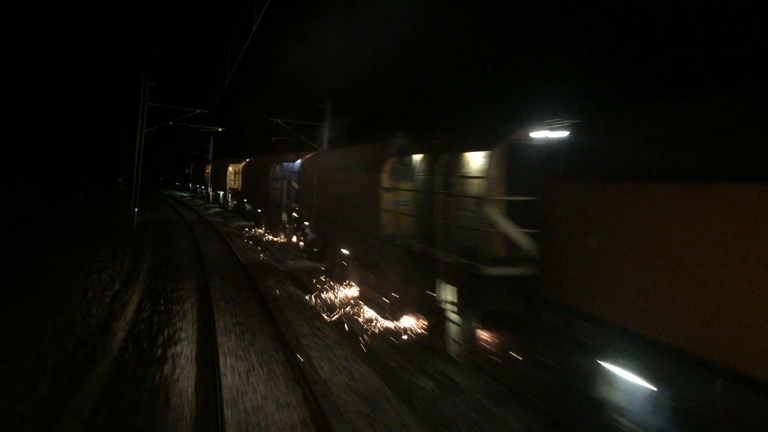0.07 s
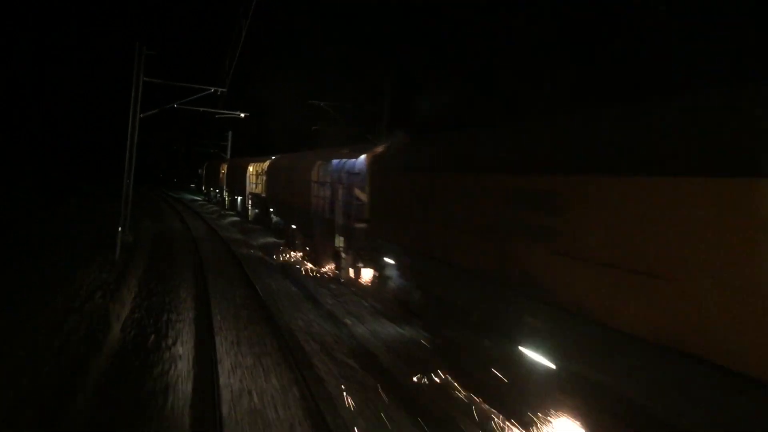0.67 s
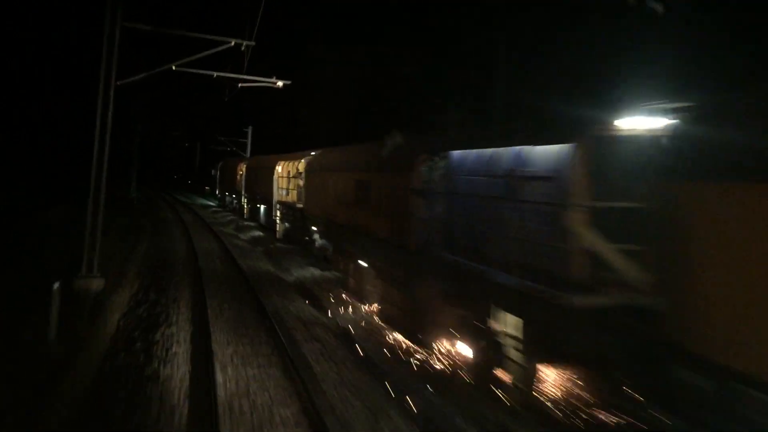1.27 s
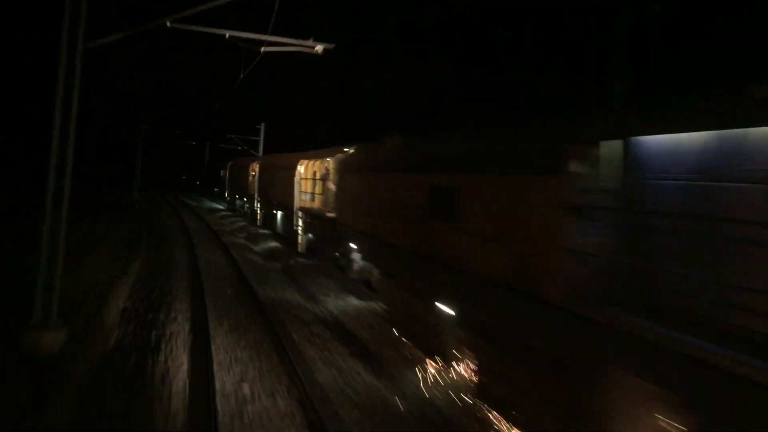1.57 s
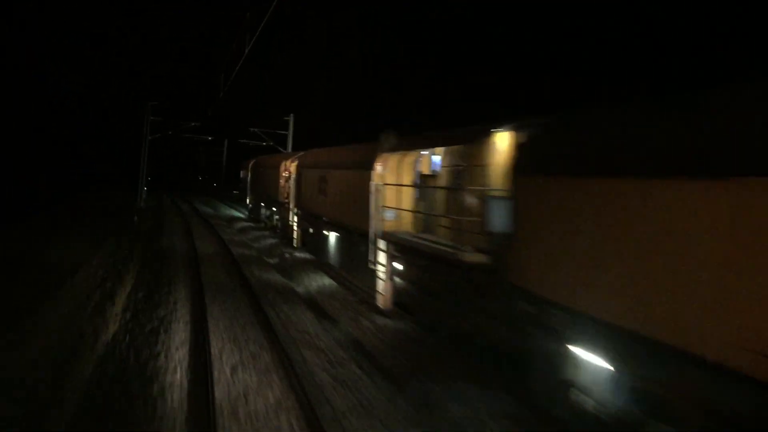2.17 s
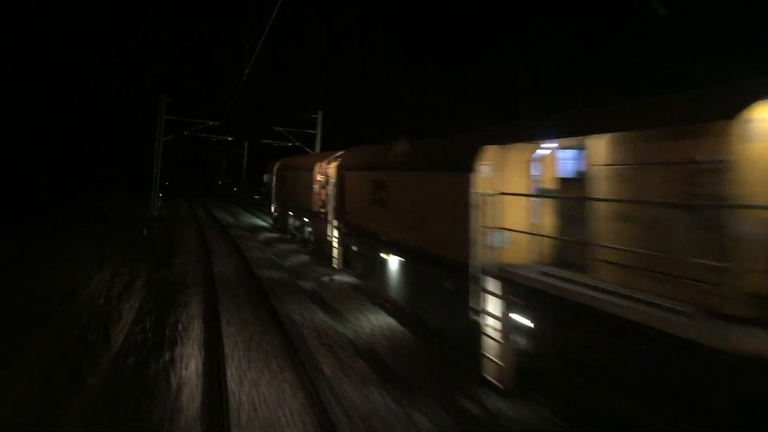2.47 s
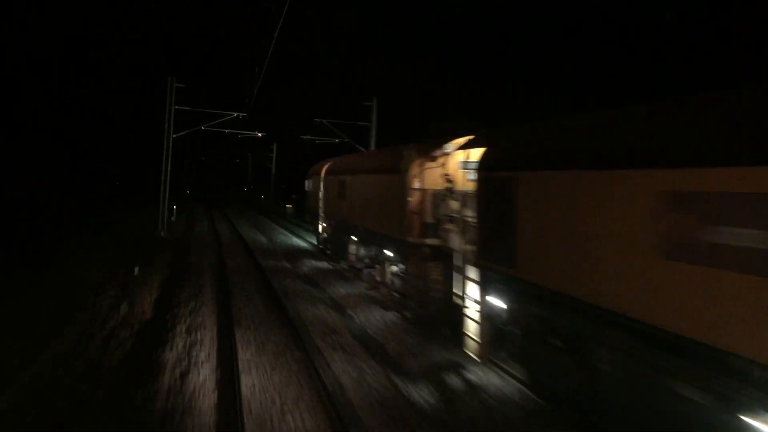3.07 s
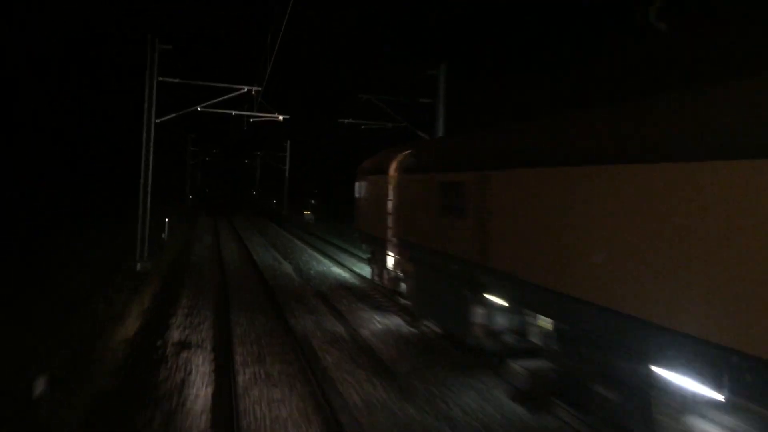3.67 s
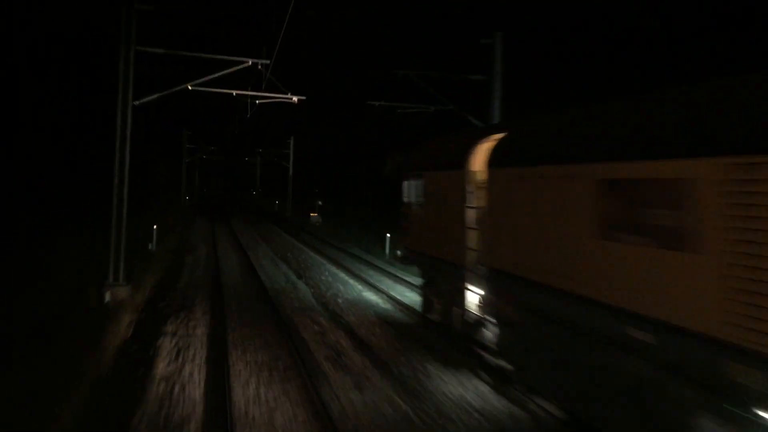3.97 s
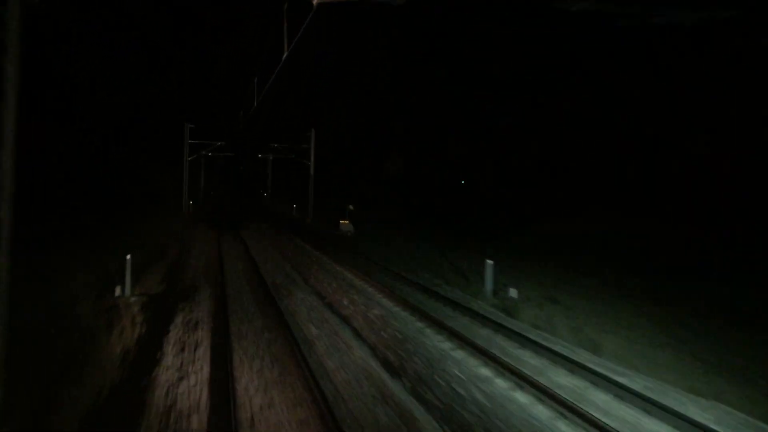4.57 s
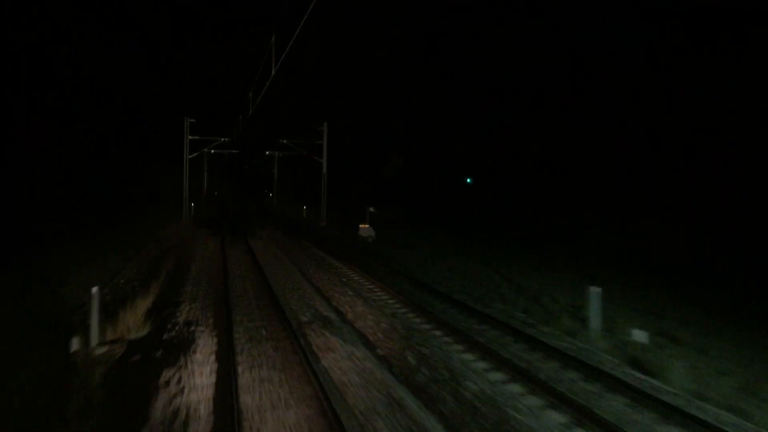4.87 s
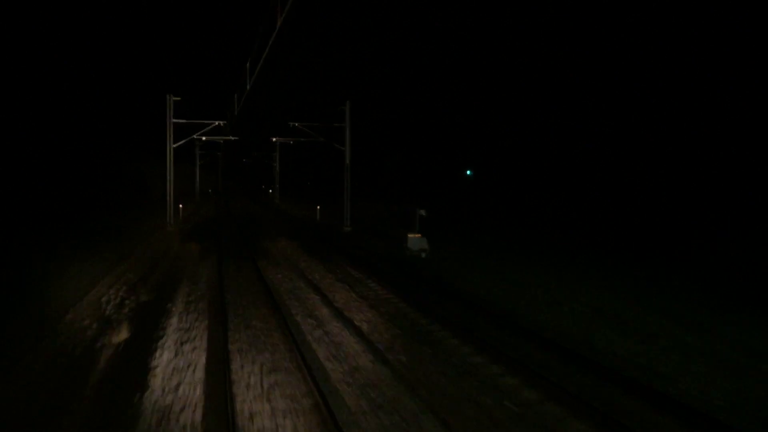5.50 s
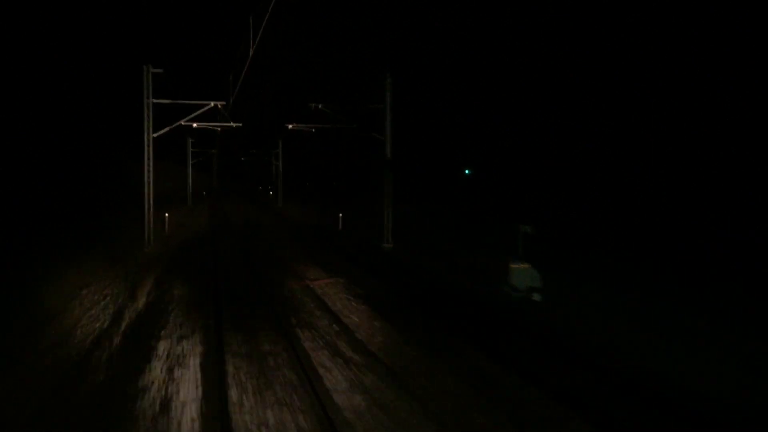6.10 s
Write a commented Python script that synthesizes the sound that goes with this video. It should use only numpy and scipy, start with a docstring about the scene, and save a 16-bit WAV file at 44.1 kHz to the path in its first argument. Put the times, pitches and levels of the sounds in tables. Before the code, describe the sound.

A moving train rumbles with squealing wheels as a rail grinding train roars past on the next track.

```python
"""A rail grinder passing a moving train.

Heard from the cab, the body rumbles, the drive whines and, in a curve, flange friction makes the
wheels ring and squeal. On the next track a grinding train goes by: its stones roar on the rail and
throw sparks, and its engines drone past in turn, each falling in pitch by the Doppler effect."""
import sys
import numpy as np
from scipy import signal
from scipy.fft import rfft, irfft
from scipy.io import wavfile
from scipy.ndimage import uniform_filter1d

SR = 44100
rng = np.random.default_rng(int(sys.argv[2]) if len(sys.argv) > 2 else 0)


def wrap_up_sound(samples):
    """Save the sound to the file named by the first command line argument, as 16-bit audio."""
    columns = np.atleast_2d(samples).T
    # keep every value between -1 and 1, then stretch to whole-number steps
    tamed = np.clip(columns, -1, 1)
    steps = np.round(tamed * 32767).astype(np.int16)
    wavfile.write(sys.argv[1], SR, steps)


N = 279594
TIME = np.arange(N) / SR


def gain_of(db):
    """Amplitude ratio of a level in decibels."""
    return 10 ** (np.asarray(db) / 20)


def unit_rms(x):
    """Normalisation to an rms of one."""
    return x / np.sqrt(np.mean(x ** 2) + 1e-20)


def curve(rows):
    """Linear interpolation of (time [s], value) rows at every sample."""
    return np.interp(TIME, *np.transpose(rows))


def swells(rows, edge_s):
    """Superposed smooth pulses, from rows of (centre [s], duration [s], height)."""
    total = np.zeros(N)
    for s, length, height in rows:
        rise = np.tanh((TIME - s + length / 2) / edge_s)
        fall = np.tanh((TIME - s - length / 2) / edge_s)
        total += height / 2 * (rise - fall)
    return total


def drift(rate_hz):
    """Random fluctuation: low-pass noise of unit rms."""
    hz = np.fft.rfftfreq(N, 1 / SR)
    return unit_rms(irfft(rfft(rng.standard_normal(N)) / (1 + (hz / rate_hz) ** 2), N))


def tone(hz):
    """A sinusoid of unit rms whose phase is the integral of its frequency."""
    return np.sqrt(2) * np.sin(2 * np.pi * (np.cumsum(hz * np.ones(N)) / SR + rng.random()))


def noise(spectrum, patchy_db, size=1024):
    """Spectrally shaped noise of unit rms, its level varying in small patches of time and frequency."""
    frames = signal.stft(rng.standard_normal(N), nperseg=size)[2]
    patches = uniform_filter1d(rng.standard_normal(frames.shape), size=12, axis=0)
    patches = unit_rms(uniform_filter1d(patches, size=6, axis=1))
    white = signal.istft(frames * gain_of(patchy_db * patches), nperseg=size)[1][:N]
    hz = np.fft.rfftfreq(N, 1 / SR) + 1
    points_hz, db = np.transpose(spectrum)
    colour = gain_of(np.interp(np.log(hz), np.log(points_hz), db))
    roll_off = np.minimum(1, points_hz[-1] / hz) ** 2  # above the last point
    return unit_rms(irfft(rfft(white) * colour * roll_off, N))


def ringing(modes):
    """Resonance under friction: each mode wanders in amplitude and phase within its bandwidth."""
    return sum(gain_of(db) * unit_rms(drift(width / 2) * tone(hz) + drift(width / 2) * tone(hz))
               for hz, width, db in modes)


def nearness(abreast_s, half_width_s):
    """Inverse-distance law for a source passing in a straight line, equal to one when abreast."""
    return 1 / np.hypot(1, (TIME - abreast_s) / half_width_s)


# Machinery hum: (frequency [Hz], level relative to the rumble [dB])
HUM_TONES = [(49.8, -12.5), (58.7, -1), (72.6, -0.5), (99.9, -7.5), (116.4, -7.5), (174.5, -21.5),
             (232.7, -26), (264, -25)]
# Low rolling noise: (frequency [Hz], relative spectral density [dB])
RUMBLE_SPECTRUM = [(15, -29.5), (28, -25), (40, -12), (55, -3.5), (80, -0.5), (105, -2), (135, -9),
                   (168, -5.5), (205, -15), (222, -15.5), (255, -16), (292, -23), (345, -19.5), (450, -30),
                   (700, -49.5)]
# Envelope of rumble and hum: (time [s], level [dB])
RUMBLE_LEVELS = [(0, -26), (1, -28), (1.4, -25), (2.1, -29), (2.7, -25.5), (3.7, -27), (4.2, -24.5),
                 (4.7, -25.5), (6.34, -24.5)]
# High rolling noise: (frequency [Hz], relative spectral density [dB])
ROLLING_SPECTRUM = [(250, -36), (480, 1.5), (560, -3.5), (620, 3), (700, 0), (950, -2.5), (1250, 2),
                    (1480, -4), (1800, -3), (2650, -7), (3200, -6), (4200, -10.5), (6500, -19),
                    (14000, -41.5)]


def cab(shake_db=0.5, hum_waver=0.24, rolling_db=-42.5):
    """Forced vibration: the body hums with its machinery and rumbles and hisses over the track."""
    hum = sum(gain_of(db) * (1 + hum_waver * drift(8.4)) * tone(hz) for hz, db in HUM_TONES)
    rumble = gain_of(shake_db * drift(9.3)) * noise(RUMBLE_SPECTRUM, patchy_db=-0.6)
    hiss = gain_of(rolling_db) * noise(ROLLING_SPECTRUM, patchy_db=1.54)
    return gain_of(curve(RUMBLE_LEVELS)) * (hum + rumble) + hiss


# Traction converter tones: (frequency [Hz], level [dB])
CONVERTER_TONES = [(1498, -77.5), (1598, -59.5), (1697, -58), (1797, -55), (3595, -59)]


def converter(flutter=0.23, wander_hz=0.66):
    """A line spectrum: the traction converter's tones waver in level about near-constant pitches."""
    return sum(gain_of(db) * (1 + flutter * drift(1.8)) * tone(hz + wander_hz * drift(5.0))
               for hz, db in CONVERTER_TONES)


# Pitch of the gear whine: (time [s], frequency [Hz])
MESH_PITCH = [(0, 1226), (1.5, 1228), (3.5, 1231), (4.7, 1235), (6.34, 1237)]
# Surges of the whine: (centre [s], duration [s], rise [dB])
GEAR_SURGES = [(.25, 0.21, 8), (.64, .2, 11.5), (1.62, 0.28, 5), (2.56, .16, 5.5), (2.8, 0.074, 9),
               (3.46, 0.11, 6.5), (3.75, 0.1, 9.5), (4.16, 0.17, 6.5), (4.37, 0.1, 11), (4.67, .12, 8),
               (4.87, .12, 8.5), (5.3, .5, 6.5), (5.9, 0.42, 4), (6.28, .1, 5)]


def gears(start_db=-54.5, rise_db_per_s=0.5, wander_hz=1.7, flutter=0.047):
    """Tooth meshing: the gears whine, rising in pitch and level as the train gathers speed."""
    level_db = start_db + rise_db_per_s * TIME + swells(GEAR_SURGES, edge_s=0.034)
    whine = tone(curve(MESH_PITCH) + wander_hz * drift(24.2))
    return gain_of(level_db) * whine * (1 + flutter * drift(25))


# Steady flange rub, letting go as the curve ends: (time [s], level [dB])
RUB_LEVELS = [(0, -51), (1, -48), (2.1, -46.5), (3, -47), (4.4, -46), (5.1, -50.8), (5.97, -50.8),
              (6.1, -67), (6.34, -69)]
# Harder bites of the flanges: (centre [s], duration [s], rise [dB])
FLANGE_BITES = [(.21, 0.42, 5.5), (.54, 0.26, 4), (1.38, 0.6, 3), (1.76, 0.092, 2.5), (2.54, 0.62, 3.5),
                (3.48, 0.51, 3), (4.17, .16, 0.5), (4.61, 0.12, 6), (4.86, 0.19, 5)]


def rub_db():
    """Sliding friction of flange on rail: the level that drives the ring and the squeal."""
    return curve(RUB_LEVELS) + swells(FLANGE_BITES, edge_s=0.035)


# Broad ring of the wheels: (frequency [Hz], relative spectral density [dB])
RING_SPECTRUM = [(4300, -14.5), (4900, -13), (5150, 1.5), (5400, 6.5), (5700, 1.5), (5950, -7),
                 (6300, -17.5), (7800, -43), (10000, -42)]
# Single wheel modes: (frequency [Hz], bandwidth [Hz], level relative to the broad ring [dB])
RING_MODES = [(5030, 48, -16), (5200, 58, -16), (5510, 28, -17)]
# Shrill ring an octave higher: (frequency [Hz], relative spectral density [dB])
SHRILL_SPECTRUM = [(8500, -16), (10250, -3), (10800, -0.5), (11250, 2.5), (11700, -5), (12300, -35),
                   (14000, -46)]
# Envelope of the shrill ring: (time [s], level relative to the rub [dB])
SHRILL_LEVELS = [(0, -18.5), (.6, -15.5), (1, -19), (2.5, -20.5), (3.8, -21), (4.6, -20), (5.6, -19.5),
                 (6.34, -26)]


def wheel_ring(ring_over_rub_db=4.5, chatter_db=0.54):
    """Frictional excitation: flanges chatter on the rail and set the wheels ringing in two bands."""
    ring = gain_of(ring_over_rub_db) * (noise(RING_SPECTRUM, patchy_db=1.0) + ringing(RING_MODES))
    shrill = gain_of(curve(SHRILL_LEVELS)) * noise(SHRILL_SPECTRUM, patchy_db=2.0)
    return gain_of(rub_db() + chatter_db * drift(60)) * (ring + shrill)


# Sharp flares of the squeal: (centre [s], duration [s], level [dB])
SQUEAL_FLARES = [(0.12, .04, -36.5), (1.18, .06, -42), (1.293, .03, -35), (1.381, 0.088, -33.5),
                 (1.487, 0.025, -31), (1.618, 0.056, -38), (2.332, .07, -36), (2.525, .03, -36),
                 (2.643, 0.032, -40), (2.752, .03, -34), (3.25, .03, -46), (3.679, 0.023, -38),
                 (4.156, 0.025, -35), (4.612, 0.11, -37.5), (4.9, 0.024, -36.5)]
LOCK_DB, LOCK_SLOPE = -34.5, 1.22  # level at which the steady squeal equals the rub; dB per dB of rub


def squeal(pitch_hz=5401, wander_hz=9, flutter=0.62, stutter_db=1.6, octave_over_rub_db=-28.5):
    """Stick-slip oscillation: one wheel mode stutters and flares; a faint octave follows the rub."""
    hz = pitch_hz + wander_hz * drift(59.3)
    fundamental = tone(hz) * unit_rms(1 + flutter * drift(32))
    octave = gain_of(octave_over_rub_db + rub_db()) * tone(2 * hz) * unit_rms(1 + flutter * drift(28))
    steady = gain_of(LOCK_DB + LOCK_SLOPE * (rub_db() - LOCK_DB) + stutter_db * drift(14))
    flares = swells([(s, length, gain_of(db)) for s, length, db in SQUEAL_FLARES], edge_s=0.012)
    return np.hypot(steady, flares) * fundamental + octave


# Brief notes from the grinder: (centre [s], duration [s], frequency [Hz], fall [Hz], level [dB])
PASSING_NOTES = [(1.19, .1, 730, 8, -45.5), (1.59, .17, 1410, 16, -41.5), (1.77, .08, 1395, 10, -46),
                 (1.33, .12, 175, 8, -31)]


def passing_notes(waver=0.38):
    """Doppler glide: short notes swell and sink a little in pitch as their source sweeps past."""
    total = np.zeros(N)
    for s, length, hz, fall_hz, db in PASSING_NOTES:
        offset = np.clip((TIME - s) / length, -1, 1)
        envelope = np.exp(-(2 * offset) ** 4)
        total += gain_of(db) * envelope * tone(hz - fall_hz * offset)
    return total * (1 + waver * drift(27))


# Spark showers: (time abreast [s], half-width [s], level [dB])
SPARK_SHOWERS = [(.48, .16, -62), (1.83, .18, -57.5)]
# Hiss of the sparks: (frequency [Hz], relative spectral density [dB])
SPARK_SPECTRUM = [(2000, -19), (7000, 5), (11000, -1), (15000, -10)]


def sparks(falloff=2.9):
    """Attenuation with distance: each shower of sparks hisses up and fades steeply as it passes."""
    envelope = sum(gain_of(db) * nearness(s, width) ** falloff for s, width, db in SPARK_SHOWERS)
    return envelope * noise(SPARK_SPECTRUM, patchy_db=1.5)


# Roaring machinery: (time abreast [s], half-width [s], level [dB])
GRINDING_UNITS = [(.6, 0.44, -39.5), (1.4, 0.15, -39.5), (1.82, .2, -39), (2.6, .27, -38.5),
                  (3.65, .35, -49.5), (4.85, .12, -48.5)]
# Roar of stones and blowers: (frequency [Hz], relative spectral density [dB])
ROAR_SPECTRUM = [(150, -3), (400, 0), (600, -10), (950, -4), (1200, -7), (1550, -1), (1850, 1), (2200, 0.5),
                 (2650, -9), (3000, -4.5), (3600, -12.5), (4600, -8), (8000, -31), (15000, -43)]
# Steel resonances: (frequency [Hz], bandwidth [Hz], level relative to the roar [dB])
STEEL_MODES = [(358.2, 56, -9), (610, 20, -17.5), (1170, 44, -16.5), (1364, 62, -15), (1866, 83, -22.5),
               (2140, 23, -16), (2950, 46, -19.5)]


def grinding_stones(rasp_db=-1.0):
    """Abrasion: stones rasp on the rail and ring the steel; the passing units add in power."""
    power = sum((gain_of(db) * nearness(s, width)) ** 2 for s, width, db in GRINDING_UNITS)
    rasp = gain_of(rasp_db * drift(70))
    roar = noise(ROAR_SPECTRUM, patchy_db=0.8) + ringing(STEEL_MODES)
    return np.sqrt(power) * rasp * roar


# The grinder's engines: (time abreast [s], level [dB])
ENGINE_PASSES = [(-.3, -15.5), (0.731, -18), (1.812, -15.5)]
# Booms and sags of the drone in the cab: (centre [s], duration [s], level change [dB])
DRONE_BOOMS = [(.2, 0.068, -7.5), (.44, 0.056, 5), (.61, 0.059, 6.5), (.87, 0.17, 4), (1.3, 0.23, -4),
               (1.78, 0.072, -3.5), (1.92, 0.12, 5.5), (2.14, 0.05, 2.5), (2.32, .08, -2)]


def engines(abreast_hz=90.45, swing_hz=4.2, glide_s=0.19, approach_s=0.43, recede_s=0.63, falloff=2.06):
    """Doppler effect: each exhaust note drops in pitch as it passes, fading more slowly than it rose."""
    drone = np.zeros(N)
    for s, db in ENGINE_PASSES:
        hz = abreast_hz - swing_hz * np.tanh((TIME - s) / glide_s)
        half_width_s = np.where(TIME < s, approach_s, recede_s)
        drone += gain_of(db) * nearness(s, half_width_s) ** falloff * tone(hz)
    return gain_of(swells(DRONE_BOOMS, edge_s=0.019)) * drone


def scene():
    """Superposition: the sounds of both trains add in the cab, in one channel."""
    own_train = cab() + converter() + gears() + wheel_ring() + squeal()
    grinding_train = passing_notes() + sparks() + grinding_stones() + engines()
    return (own_train + grinding_train)[None]


def record(dry, cutoff_hz=15300):
    """Band limiting: a linear-phase low-pass filter removes the highest treble."""
    low_pass = signal.firwin(511, cutoff_hz, window=("kaiser", 9), fs=SR)
    return signal.oaconvolve(dry, low_pass[None], "same")


dry = scene()
out = record(dry)
wrap_up_sound(out)
```